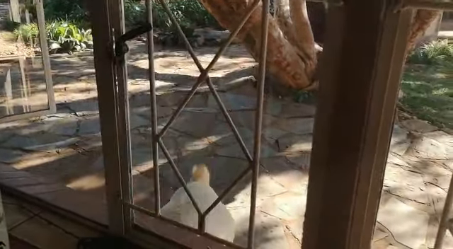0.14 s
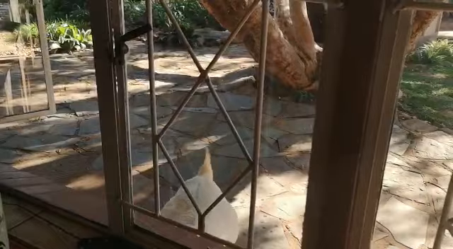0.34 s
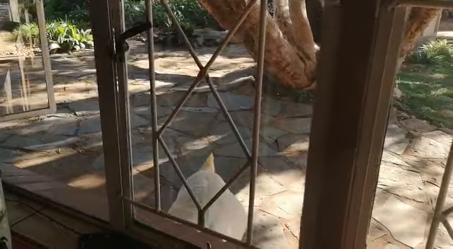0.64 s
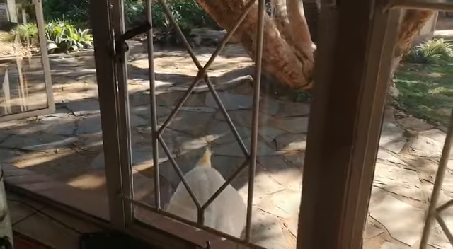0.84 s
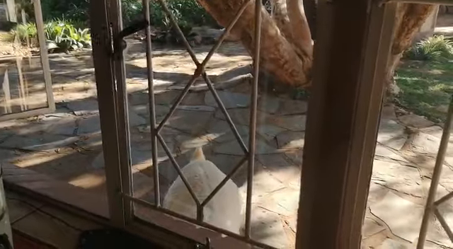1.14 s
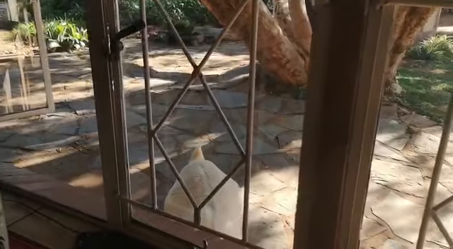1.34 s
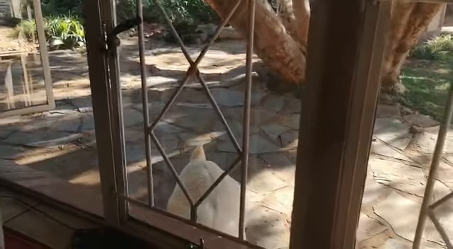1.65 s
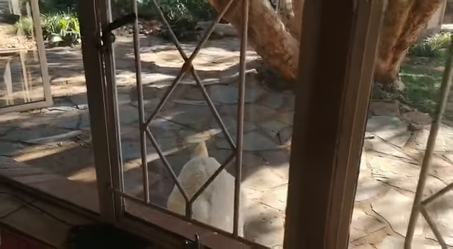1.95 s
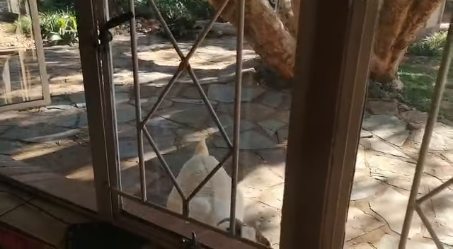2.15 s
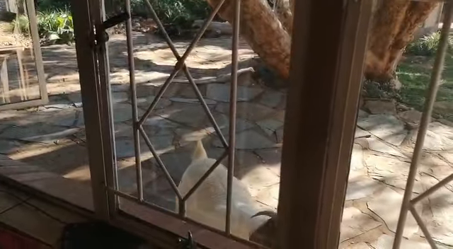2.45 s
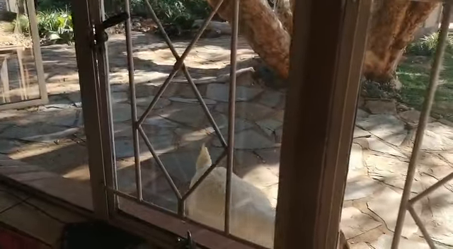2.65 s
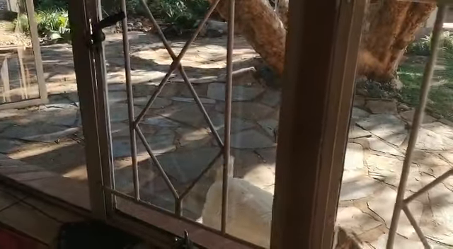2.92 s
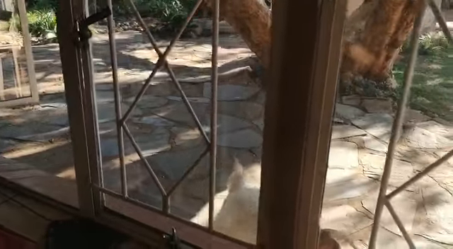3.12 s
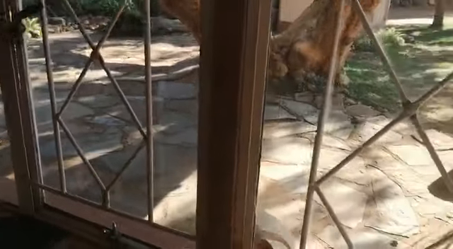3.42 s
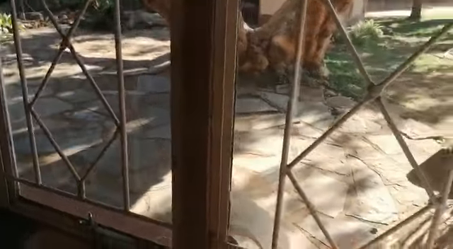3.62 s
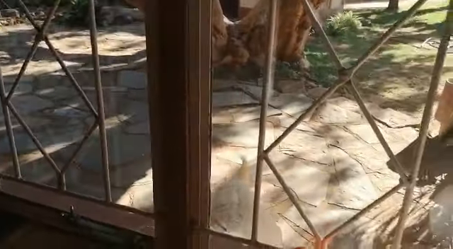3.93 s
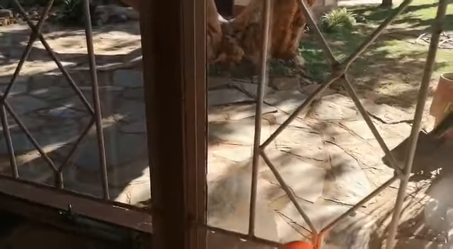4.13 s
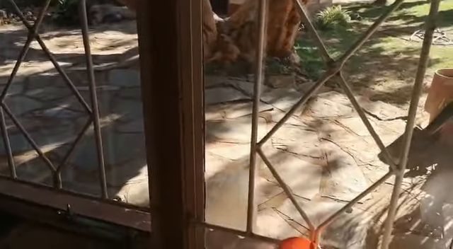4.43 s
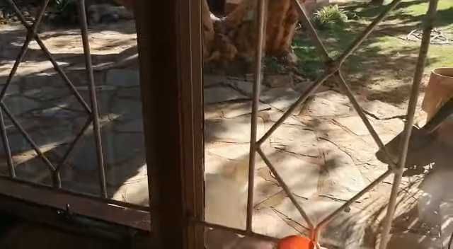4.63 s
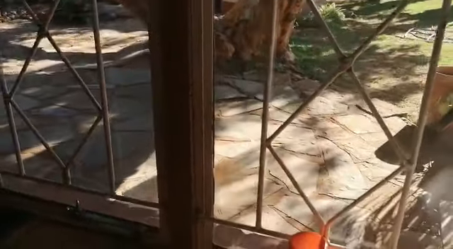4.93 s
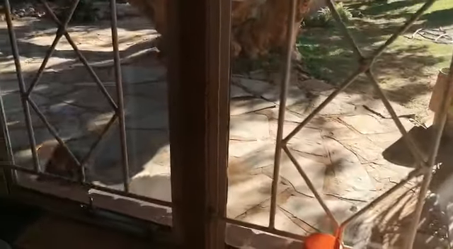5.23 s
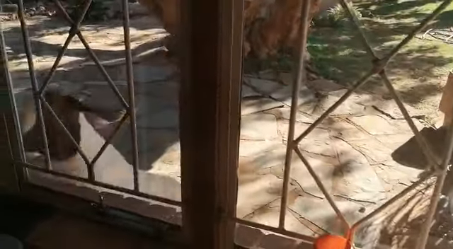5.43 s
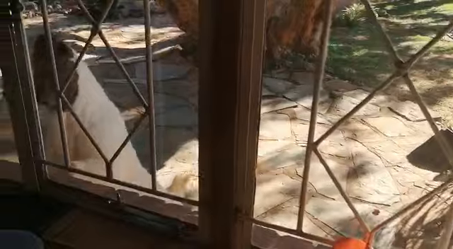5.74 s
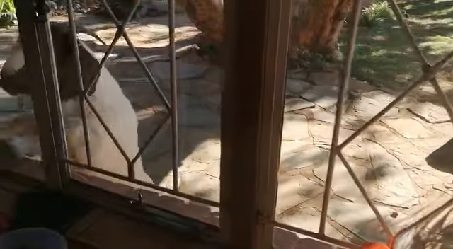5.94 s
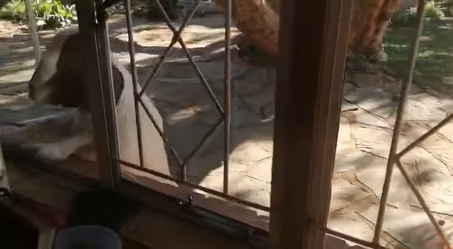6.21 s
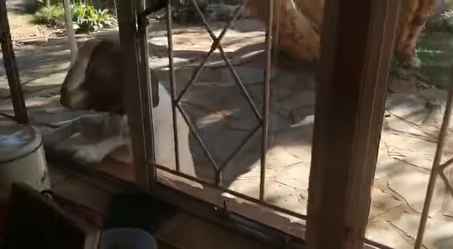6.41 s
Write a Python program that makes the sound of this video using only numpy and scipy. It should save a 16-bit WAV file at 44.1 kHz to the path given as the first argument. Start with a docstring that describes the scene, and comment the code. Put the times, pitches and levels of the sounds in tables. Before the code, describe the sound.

A goat butts a barred window while the microphone sits indoors nearby. Quiet rubbing leads to hard metallic knocks with short ringing bars and booming panes. Scrapes and small squeaks link to another rattling cluster. It suddenly calms to room air, with a couple of barely audible thuds, then soft hoof thumps, clops and gritty scratches. A light garden hiss grows midway.

```python
"""A goat butts and paws at a steel-framed window with burglar bars, heard from the room behind it.
Faint slides and a grind lead to a flurry of blows: damped modes and bursts of noise make the window sway,
the panes boom, the frame knock and the bars chatter, amid grinds, squeaks and a drone of rubbed steel and glass.
A few soft thuds follow; then hooves thump, clop and scratch on the sill.
Room air, a wavering hum and a garden hiss that grows midway, all steady tones and noise, lie underneath."""
import sys
import numpy as np
from scipy import signal
from scipy.fft import rfft, irfft, next_fast_len
from scipy.io import wavfile
from scipy.ndimage import uniform_filter1d, map_coordinates

SR = 44100
rng = np.random.default_rng(int(sys.argv[2]) if len(sys.argv) > 2 else 0)


def generate_wav(sig):
    """Save sig (samples, or channels by samples) to the path in sys.argv[1] as 16-bit PCM at SR."""
    pcm = np.round(np.clip(np.atleast_2d(sig).T, -1, 1) * 32767).astype(np.int16)
    wavfile.write(sys.argv[1], SR, pcm)


N = 289737

# Blows on the window: (time [s], force [dB], shove on the whole window [dB], share of the panes [dB],
# share of the frame [dB], brightness of the clank [dB per octave], sharpness of the horn [dB], contact rise [s])
BLOWS = [(0.104, -60.5, 9.5, 9, -5, 2, -1, 0.016), (1.4801, -23, -19, -6, 4, 3, 2, 0.0001),
         (1.5142, -21.5, -10.5, -8, 0.5, 1, 2.5, 0.0013), (1.543, -21.5, -25, 3, 2, -0.5, 0.5, 0.0013),
         (1.581, -27.5, -30, 1, 4.5, -0.5, 2, 0.00021), (1.617, -38, -13, 8.5, 2, 7, -12, .001),
         (1.682, -37.5, -8.5, -14, -2, -1.5, -7, 0.0007), (2.033, -36.5, -16, 0.5, 0.5, 14, 5, 0.00091),
         (2.168, -40, -18, 6, 1.5, 11, -0.5, 0.00068), (2.197, -41.5, -9, -3, 1, 9, 3, 0.0022),
         (2.262, -25, -28, -4, 0, 1.5, -7, 0.00036), (2.288, -39, -21, -19, -15, 3, 3, 0.00088),
         (2.402, -43, -10, -5, -10, 4.5, -8, 0.0027), (2.512, -45.5, -23, 5.5, 3, -4, -4.5, 0.012),
         (2.813, -25, -28, -12.5, -13.5, -1.5, -7.5, 0.0004), (2.823, -31, -12, -16, -3, 3, 1.5, 0.0092),
         (2.94, -23.5, -10, -1.5, -0.5, 1.5, 5.5, 0.00024), (2.956, -33, -10, -1, 4, 2, -14, 0.0014),
         (2.985, -37.5, -15, -1, 4, 7, 3, 0.0015), (3.059, -35, -14, 2, -7, 0, -6, 0.0042),
         (3.099, -25.5, -11, -8, 1, -4, -2.5, 0.00018), (3.124, -31, -4, -10, -3.5, -9, -3.5, 0.0016),
         (3.16, -32, -15, -13, 1, 11, -1, 0.0012), (3.209, -33, 4.5, -9, 2.5, 7, 0, 0.0014),
         (3.258, -28, -3, -6.5, -2.5, -2, -2, 0.00018), (3.297, -48, 3.5, 10, -3, -9, 6, 0.0028),
         (4.179, -53.5, -14, 14.5, 1.5, 1, -5, 0.0019), (4.271, -61, 12.5, 23, -8, 2, -1, 0.0027),
         (4.329, -59.5, -12, -1, -4, 2, 7, 0.003), (5.331, -69.5, -13, 11.5, -10, 2, -4, 0.0084)]
# Damped modes of the whole window, panes, frame and bars:
# (frequency [Hz], relative level [dB], longest decay t60 [s])
SWAY = [(31.8, 4, 0.34), (51.5, 1, 0.27)]
PANES = [(83, 0, 0.12), (107.1, 7.5, 0.42), (118, 27, 0.17), (147.5, 10.5, 0.26), (161, 12, 0.15),
         (188.5, -2.5, 0.64)]
FRAME = [(229, -3, 0.54), (268.6, 12, 0.22), (290.4, 1, 0.43), (344.4, 3.5, 0.21), (403.7, -2, 0.43),
         (467, -3.5, 0.39), (558.6, 0, 0.38), (692, -7.5, 0.35)]
BARS = [(735, -16, 0.43), (832, -6, 0.2), (951, 0, 0.18), (1030, -1.5, 0.097), (1105, -6, 0.16),
        (1216, -9, 0.27), (1430, -10, 0.27), (1590, 0, 0.16), (1660, 3.5, 0.44), (1800, -13, 0.17),
        (1940, 3.5, 0.18), (2200, -16, 0.22), (2470, -11, 0.32), (2935, -3, 0.083)]
# Noise spectra of the dense rattle in panes, frame, bars and contact: (frequency [Hz], density [dB per Hz])
BOOM = [(35, -14), (70, -10), (120, -3.5), (190, -19.5), (300, -62)]
KNOCK = [(130, -34.5), (215, -2.5), (285, -0.5), (420, -2.5), (600, -13), (950, -63)]
CLANK = [(380, -21.5), (680, 5.5), (1100, 1.5), (1700, -1), (2150, 2), (2850, -3), (3400, -21),
         (6000, -27.5)]
TICK = [(1800, -48), (3300, -3.5), (5000, -5.5), (7500, -7.5), (9500, -13), (11000, -14.5), (12500, -20.5),
        (15000, -33)]
TICK_DB = -15  # contact tick before the sharpness of the horn is added
SPOT_RIPPLE_DB = 4.5  # each struck spot favours other overtones of the steel

# A loose bar clacks against the frame: (time [s], level [dB], centre [Hz])
CLACKS = [(1.481, -23.5, 1640), (1.5157, -24, 2190), (1.526, -27, 1440), (1.614, -35, 2240),
          (1.66, -46, 1790), (1.684, -41.5, 1600), (2.049, -38, 2140), (2.065, -38, 2200),
          (2.266, -24, 1100), (2.8144, -22.5, 2100), (2.867, -36, 2800), (2.944, -23.5, 1500),
          (2.953, -27, 1670), (3.059, -40, 1820), (3.068, -35, 2020), (3.088, -35.5, 2450),
          (3.101, -21, 1160), (3.128, -29, 1090), (3.162, -32, 1480), (3.259, -34.5, 1850),
          (5.7315, -43, 1100), (6.328, -54, 2200)]
CLACK_T60_S, CLACK_ROOM_DB, CLACK_SKIRT_DB = 0.022, -16.5, -15.5  # skirt: level an octave off the centre
# A bar struck at one spot sings out briefly: (time [s], frequency [Hz], level [dB], decay t60 [s])
SINGS = [(1.48, 1560, -16.5, 0.11), (1.519, 407, -15, 0.2), (1.517, 1388, -21.5, 0.22),
         (1.545, 520, -24, .2), (1.542, 5840, -29, 0.019), (1.582, 1285, -30, 0.2),
         (1.632, 1652, -41, 0.32), (2.034, 554, -33.5, 0.18), (2.264, 1075, -21, 0.054),
         (2.263, 1903, -17, 0.046), (2.262, 334, -22, 0.05), (2.814, 1665, -21, 0.25),
         (2.814, 1135, -29, 0.38), (2.814, 2960, -29.5, 0.18), (3.1, 1064, -21.5, 0.13),
         (3.101, 3520, -30, 0.092), (3.125, 1057, -35, 0.22), (4.18, 296, -45.5, 0.17),
         (5.729, 965, -43, 0.18), (5.806, 1960, -47, 0.17), (6.327, 2210, -50.5, 0.065)]
SING_RISE_S = 0.00034
# Horn squeaks on a bar: (time [s], length [s], frequency [Hz], level [dB], line width [Hz])
SQUEAKS = [(2.05, 0.029, 2035, -32, 90), (2.048, 0.04, 2966, -43, 40), (2.05, .11, 1660, -48, 40),
           (2.098, .04, 1990, -44, 130), (2.168, .03, 590, -37, 50), (2.976, 0.066, 610, -34, 30),
           (3.195, 0.04, 1653, -30.5, 4), (3.27, 0.06, 1653, -38, 4)]
SQUEAK_RISE_S, SQUEAK_FADE_DB_PER_S = 0.004, 502
SQUEAK_FLUTTER_DB, SQUEAK_SLIPS_PER_S = 2.5, 110
# A hard tip scratches over metal or grit: (time [s], length [s], centre [Hz], level [dB])
SCRATCHES = [(0.18, .004, 7300, -64), (2.122, 0.02, 3830, -58), (2.238, 0.004, 6360, -49),
             (2.252, 0.004, 7150, -43), (2.652, .012, 4050, -65), (2.866, 0.008, 5600, -40),
             (2.951, .005, 6000, -30), (3.056, 0.0069, 6460, -58), (3.164, 0.041, 5200, -44),
             (5.412, 0.018, 8600, -74), (5.85, 0.027, 6500, -61), (6.028, .008, 4000, -66),
             (6.076, .02, 4500, -56), (6.158, .004, 5600, -62), (6.177, 0.005, 6300, -57.5),
             (6.201, .004, 6500, -62)]
SCRATCH_CATCHES_PER_S, SCRATCH_SKIRT_DB, SCRATCH_ROOM_DB = 1300, -12.5, -27  # skirt: an octave off the centre

# Grinds across the bars: (touch [s], full pressure [s], let go [s], relative rasp [dB], relative judder [dB])
GRINDS = [(0.9, 1.364, 1.45, -64, -48), (2.026, 2.075, 2.38, -53, -47), (2.21, 2.253, 2.388, -45.5, -42.5),
          (2.476, 2.512, 2.555, -49, -50), (2.582, 2.862, 2.99, -36, -31),
          (3.077, 3.16, 3.21, -34.5, -27.5)]
GRIND_SWELL_DB, GRIND_FADE_DB_PER_S = 22.5, 220
STICK_SLIP_DB, STICK_SLIP_PER_S = 2, 45  # the horn sticks and slips, so a grind comes in uneven surges
# Noise spectrum of the juddering frame: (frequency [Hz], density [dB per Hz])
JUDDER = [(45, -41), (100, 0.5), (160, 5), (240, -6), (420, -6), (700, -5.5), (1200, -24)]
# Light slides along the frame: (touch [s], full pressure [s], let go [s], relative hiss [dB],
# answer of the bar [dB], whistle [Hz], whistle relative to the hiss setting [dB])
SLIDES = [(0.04, 0.13, 0.14, -67.5, -72, 5700, -9), (0.74, 1.34, 1.382, -47, -40.5, 10650, -13.5),
          (2.622, 2.913, 2.94, -47, -53, 7630, -17), (3.062, 3.18, 3.21, -57, -61, 7440, -9),
          (3.252, 3.412, 3.53, -76.5, -75, 8850, -8)]
SLIDE_SWELL_DB, SLIDE_FADE_DB_PER_S = 28, 110
WHISTLE_OCTAVES = 0.16  # half width of the thin whistle in a slide
# Noise spectra of the slide and of the lower bar that answers it: (frequency [Hz], density [dB per Hz])
SWISH = [(240, -26), (350, -5), (560, -8.5), (701, -2.5), (850, -18.5), (1190, -19.5), (1430, -12),
         (1570, -15), (2300, 1), (2650, -1), (3340, -3.5), (4200, -3.5), (5700, -7.5), (6200, -15.5),
         (7000, -5), (7900, -14), (8690, -8.5), (9370, -18.5), (11000, -14.5), (12000, -23), (13000, -23),
         (15000, -39)]
BAR_RUB = [(600, -17), (1000, -7.5), (1250, -17), (1430, -4.5), (1700, -7), (2200, 2), (2700, -0.5),
           (3400, -30)]
BAR_RUB_LAG_S = 0.066
# One rub that makes a pane drone: (touch [s], full pressure [s], let go [s])
GROAN_S = (2.04, 2.33, 2.39)
GROAN_DB, GROAN_SWELL_DB, GROAN_FADE_DB_PER_S = -31.5, 8.5, 229

# Hooves on the outer sill: (time [s], thump [dB], clop [dB], brightness of the clop [dB per octave])
HOOVES = [(5.503, -44.5, -54, 2.5), (5.728, -56, -44, 0.5), (5.763, -63, -49.5, -4), (5.804, -40, -40, 0.5),
          (6.075, -48.5, -43.5, 1.5), (6.125, -47, -47.5, -8.5), (6.176, -60, -55.5, 4),
          (6.214, -56, -51.5, -1.5), (6.327, -50, -61, 4)]
HOOF_RISE_S = 0.0033
# Modes of the sill with its wall, then what a hoof rings on it:
# (frequency [Hz], relative level [dB], longest decay t60 [s])
SILL = [(52.7, 5, 0.77), (65.8, -3.5, 1), (94.7, -6.5, 0.92), (142.3, -11, 0.49), (197.1, -8, 0.41)]
HOOF_MODES = [(322.5, -6, 0.52), (657, -1.5, 0.11), (749, -2, 0.24), (1264, -11.5, 0.3), (1400, -11, .33),
              (1770, -15, 0.13), (1880, -3, 0.24), (2360, -15, 0.15), (2530, -4.5, 0.18)]
# Noise spectrum of a hoof on the sill: (frequency [Hz], density [dB per Hz])
CLOP = [(110, 0.5), (200, 7.5), (270, -3.5), (370, 8.5), (480, -4), (600, 2.5), (950, -2.5), (1400, -7),
        (2300, -6.5), (3200, -15), (5000, -22.5), (9000, -32.5), (15000, -46)]

# Noise spectra of the room air and the far garden: (frequency [Hz], density [dB per Hz])
AIR = [(12, -60), (20, 0.5), (62, -2.5), (189, -10.5), (211, -8), (294, -7.5), (387, -5.5), (445, -15.5),
       (484, -16), (1140, -15.5), (1390, -19), (1730, -12.5), (2770, -21), (5090, -32.5), (15000, -39)]
GARDEN_HISS = [(2000, -0.5), (3600, 0), (4800, 1), (5800, -2.5), (6800, -1.5), (8000, -9), (11000, -13),
               (15000, -38)]
GARDEN_DB, GARDEN_GROWTH_DB = -72.5, 10.5  # starting level, and how much louder it levels off
GARDEN_RISES_AT_S, GARDEN_RISE_DB_PER_S = 3.25, 4
# Tones of the hum: (frequency [Hz], level [dB])
HUM = [(222, -72.5), (338, -78), (384, -74.5), (746, -77.5)]

# Reverberation of the room: (frequency [Hz], decay t60 [s])
ROOM = [(100, 0.57), (300, 0.29), (1000, 0.36), (2500, 0.37), (6000, 0.31), (14000, 0.22)]
# Echoes off the reveal, sill and panes: (left delay [s], right delay [s], level before the treble share [dB])
NEAR_WALLS = [(.00058, 0.000455, -18.5), (.00131, 0.000901, -22.5), (.0029, .0024, -13.5),
              (.0047, .0056, -14.5), (.0083, .0071, -12.5)]
LEFT_LEAD_S, LEAD_BELOW_HZ = 0.0001, 950  # the struck pane is to the left; only its long waves arrive direct
# Likeness of the two microphones in a diffuse field: (frequency [Hz], left-right likeness [-1 to 1])
ALIKE = [(60, 1), (130, 0.99), (290, 0.91), (450, 0.25), (700, -0.36), (1400, 0.14), (2500, -0.39),
         (4500, -0.024), (15000, 0.082)]
# Colour difference of the two microphones: (frequency [Hz], left minus right [dB])
LEAN = [(200, -0.5), (400, -1), (700, 0), (1300, -2.5), (2400, 0), (4400, -1.5), (8000, 7), (10500, -6.5),
        (13000, -7)]
TOP_HZ = 15700


def blows():
    """Every blow shares its force among the window's parts, from slow sway to sharp tick."""
    t = np.arange(int(.7 * SR)) / SR
    out = np.zeros((2, N + SR))
    # fast parts are levelled over their first 25 ms, slow ones over 50 ms
    onset = lambda x: unit(x, size=1100)
    swing = lambda x: unit(x, size=2200)
    for s, force_db, shove_db, pane_db, knock_db, tilt_db, sharp_db, rise in BLOWS:
        sway = amp(5) * swing(ring(SWAY, t, scatter_db=0, attack=.012))

        boom = amp(-0.5) * swing(ring(PANES, t, scatter_db=7.5, attack=rise + 0.00038))
        boom += amp(-6.5) * swing(colour(diffuse(room_tail(len(t))), BOOM))

        frame_rattle = rattle(t, rise, KNOCK, crack_db=8.5, crack_t60=0.05, chatter_db=-4, chatter_t60=0.33)
        knock = amp(-4) * onset(ring(FRAME, t, scatter_db=9.0, attack=rise))
        knock += amp(-3.5) * onset(frame_rattle)

        bar_colour = tilted(CLANK, tilt_db, pivot_hz=1500)
        bar_rattle = rattle(t, rise, bar_colour, crack_db=6.0, crack_t60=0.02, chatter_db=0, chatter_t60=0.21)
        clank = amp(-15.5) * onset(ring(BARS, t, scatter_db=11.0, attack=rise))
        clank += amp(-4.5) * onset(bar_rattle)

        tip_db = np.clip(.5 * sharp_db - 2.5, -6, 8)  # a sharp horn tip ticks louder and brighter
        bright = at_new_spot(tilted(TICK, tip_db, pivot_hz=5000))
        tip_rattle = rattle(t, rise + 0.001, bright, crack_db=17.5, crack_t60=0.021,
                            chatter_db=-3, chatter_t60=0.073)
        tick = amp(3.5) * onset(tip_rattle)

        body = amp(shove_db) * sway + amp(pane_db) * boom + amp(knock_db) * knock
        add_at(out, s, amp(force_db) * (body + clank + amp(TICK_DB + sharp_db) * tick))
    return out[:, :N]


def clacks():
    """Steel meets steel: a hard, very short burst in the middle range, and the room after it."""
    t = np.arange(SR // 3) / SR
    out = np.zeros((2, N + SR))
    for s, db, hz in CLACKS:
        burst = rng.standard_normal((2, len(t))) * amp(-60 * t / CLACK_T60_S)
        burst += amp(CLACK_ROOM_DB) * room_tail(len(t))
        band = [(hz / 4, 2 * CLACK_SKIRT_DB), (hz / 2, CLACK_SKIRT_DB), (hz / 1.3, 0),
                (hz * 1.3, 0), (2 * hz, CLACK_SKIRT_DB), (4 * hz, 2 * CLACK_SKIRT_DB)]
        clack = colour(diffuse(burst), at_new_spot(band))
        add_at(out, s, amp(db) * unit(clack, size=220))
    return out[:, :N]


def singing_bars():
    """A struck bar gives a short rough tone; the shorter, the rougher."""
    t = np.arange(SR // 2) / SR
    out = np.zeros((2, N + SR))
    for s, hz, db, t60 in SINGS:
        width_hz = 2.2 / t60 ** 2
        shape = (1 - np.exp(-t / SING_RISE_S)) * amp(-60 * t / t60)
        add_at(out, s, amp(db) * rough_tone(t, hz, width_hz) * shape / shape.max())
    return out[:, :N]


def squeaks():
    """A rubbed bar holds a fluttering note for as long as the horn sticks and slips on it."""
    t = np.arange(SR // 4) / SR
    out = np.zeros((2, N + SR))
    for s, length, hz, db, width_hz in SQUEAKS:
        held = amp(db - SQUEAK_FADE_DB_PER_S * np.maximum(t - length, 0))
        level = held * (1 - np.exp(-t / SQUEAK_RISE_S))
        flutter = unit(amp(SQUEAK_FLUTTER_DB * wobble(SQUEAK_SLIPS_PER_S)[:len(t)]))
        add_at(out, s, level * flutter * rough_tone(t, hz, width_hz))
    return out[:, :N]


def scratches():
    """A horn or hoof tip skids: a short run of sharp catches, and the room after them."""
    t = np.arange(SR // 4) / SR
    out = np.zeros((2, N + SR))
    for s, length, hz, db in SCRATCHES:
        caught = rng.standard_normal((2, len(t))) * (rng.random(len(t)) < SCRATCH_CATCHES_PER_S / SR)
        catches = caught * np.exp(-(t / length) ** 4)
        room = signal.fftconvolve(catches, room_tail(len(t)), axes=1)[:, :len(t)] / 2
        heard = catches + amp(SCRATCH_ROOM_DB) * room
        band = [(hz / 4, 3 * SCRATCH_SKIRT_DB), (hz / 2, SCRATCH_SKIRT_DB), (hz, 0),
                (min(2 * hz, TOP_HZ), SCRATCH_SKIRT_DB)]
        scratch = colour(diffuse(heard), at_new_spot(band))
        add_at(out, s, amp(db) * unit(scratch, size=int(length * SR) + 1))
    return out[:, :N]


def grinds():
    """Pressed hard, the horn catches on the bars and makes the frame judder."""
    rasping, juddering = 0, 0
    for touch, full, let_go, rasp_db, judder_db in GRINDS:
        pressure = stroke(touch, full, let_go, 0, GRIND_SWELL_DB, GRIND_FADE_DB_PER_S)
        rasping = rasping + amp(rasp_db) * pressure
        juddering = juddering + amp(judder_db) * pressure
    friction = slips(rate=160, spread_db=1.0, snap_db=13.5)
    catches = unit(colour(friction, tilted(CLANK, 2.7, pivot_hz=1500)))
    steel = unit(filtered(catches, lambda hz: resonances(BARS, hz)))
    surges = unit(amp(STICK_SLIP_DB * wobble(STICK_SLIP_PER_S)))
    rasp = rasping * surges * patches(amp(-9.5) * catches + amp(-9.5) * steel, depth_db=3.0)
    judder = amp(-4) * juddering * surges * rush(JUDDER, grain_db=0.5)
    return rasp + judder


def slides():
    """A smooth slide hisses with a thin whistle in it, and the rubbed bar answers a little later."""
    sliding, answering, whistling = 0, 0, 0
    for touch, full, let_go, hiss_db, bar_db, whistle_hz, whistle_db in SLIDES:
        pressure = stroke(touch, full, let_go, 0, SLIDE_SWELL_DB, SLIDE_FADE_DB_PER_S)
        sliding = sliding + amp(hiss_db) * pressure
        answering = answering + amp(bar_db) * pressure
        whistling = whistling + amp(hiss_db + whistle_db) * pressure * whistle(whistle_hz)
    even_hiss = rush(SWISH, grain_db=-1.0)
    fine_catches = unit(colour(slips(rate=1100, spread_db=3.5, snap_db=10.5), SWISH))
    hiss = amp(7.5) * (sliding * patches(even_hiss + fine_catches, depth_db=1.8) + whistling)
    late_answer = np.roll(answering, round(BAR_RUB_LAG_S * SR))
    return hiss + late_answer * rush(BAR_RUB, grain_db=0.5)


def whistle(hz):
    """The narrow band of hiss that one sliding spot favours."""
    edge = 2 ** WHISTLE_OCTAVES
    return rush([(hz / edge, -22), (hz, 0), (hz * edge, -22)], grain_db=7)


def groan():
    """Steady rubbing keeps one pane droning on a low, wavering note."""
    pitch_hz = 105 * (1 + 0.023 * wobble(25.8))
    level = stroke(*GROAN_S, GROAN_DB, GROAN_SWELL_DB, GROAN_FADE_DB_PER_S)
    return level * np.sqrt(2) * np.sin(2 * np.pi * np.cumsum(pitch_hz) / SR)


def hooves():
    """The goat rears up: each hoof thumps the sill, clops on it and rings it briefly."""
    t = np.arange(int(.7 * SR)) / SR
    out = np.zeros((2, N + SR))
    for s, thump_db, clop_db, tilt_db in HOOVES:
        thump = unit(ring(SILL, t, scatter_db=2.0, attack=0.0062), size=2200)
        spectrum = tilted(CLOP, tilt_db, pivot_hz=900)
        impact = rattle(t, HOOF_RISE_S, spectrum, crack_db=13.5, crack_t60=0.011,
                        chatter_db=-5.0, chatter_t60=0.17)
        clop = unit(impact, size=1100)
        clop += amp(-7.0) * unit(ring(HOOF_MODES, t, scatter_db=6, attack=0.0017), size=1100)
        add_at(out, s, amp(thump_db) * thump + amp(clop_db) * clop)
    return out[:, :N]


def background():
    """Room air, the wavering hum of an appliance and a far hiss from the garden."""
    t = np.arange(N) / SR
    hum = 0
    for hz, db in HUM:
        hum = hum + amp(db) * np.sqrt(2) * np.sin(2 * np.pi * hz * t + 1.26 * wobble(6))
    growth_db = np.clip(GARDEN_RISE_DB_PER_S * (t - GARDEN_RISES_AT_S), 0, GARDEN_GROWTH_DB)
    return amp(-58) * rush(AIR) + hum + amp(GARDEN_DB + growth_db) * rush(GARDEN_HISS)


def near_walls(x):
    """Close surfaces throw back the short waves and comb the treble."""
    def response(hz):
        echoes, power = 0, 0
        for left, right, db in NEAR_WALLS:
            echoes = echoes + amp(db) * np.exp(-2j * np.pi * hz * np.array([[left], [right]]))
            power = power + amp(db) ** 2
        share = hz ** 2 / (hz ** 2 + 1400 ** 2)
        return (1 + share * echoes) / np.sqrt(1 + share ** 2 * power)
    return filtered(x, response)


def from_the_left(x):
    """The long waves of the window reach the left microphone first."""
    lead = lambda hz: LEFT_LEAD_S / (1 + (hz / LEAD_BELOW_HZ) ** 4)
    return filtered(x, lambda hz: np.exp(1j * np.pi * hz * lead(hz) * np.array([[1], [-1]])))


def room_tail(size):
    """The room's answer to one click: each frequency dies at its own speed."""
    hz, t, z = signal.stft(rng.standard_normal((2, size)), SR, nperseg=256)
    decay = amp(-60 * t / along(ROOM, hz)[:, None])
    return signal.istft(z * decay, SR, nperseg=256)[1][:, :size]


def ring(modes, t, scatter_db, attack):
    """Damped modes at new strengths; higher ones reach the two microphones out of step."""
    hz, db, t60 = np.transpose(modes)[:, :, None]
    hz = hz * (1 + 0.0086 * rng.standard_normal(hz.shape))  # the animal's weight detunes the loose parts
    t60 = np.minimum(t60, 450 / hz)  # putty and paint let no mode ring much longer than 450 cycles
    level = amp(db + scatter_db * rng.uniform(-0.67, 1, hz.shape) - 60 * t / t60)
    skew = np.arccos(np.clip(along(ALIKE, hz), -1, 1)) / 2 * rng.choice([-1, 1], hz.shape)
    sign = (-1) ** np.arange(len(hz))[:, None]
    pair = []
    for side in (1, -1):
        phase = np.float32(2 * np.pi * hz * t + side * skew)
        pair.append(np.sum(sign * level * np.sin(phase), axis=0))
    return np.array(pair) * (1 - np.exp(-t / attack))


def rattle(t, rise, spectrum, crack_db, crack_t60, chatter_db, chatter_t60):
    """A crack, the chatter of loose parts after it, and the room; soft contacts build up slowly."""
    crack = rng.standard_normal((2, len(t))) * amp(crack_db - 60 * t / crack_t60)
    contacts = unit(rng.standard_normal((2, len(t))) * (rng.random(len(t)) < 300 / SR))  # 300 a second
    chatter = contacts * amp(chatter_db - 60 * t / chatter_t60)
    heard = diffuse(crack + chatter + room_tail(len(t)))
    return colour(heard * (1 - np.exp(-t / rise)), spectrum)


def resonances(modes, hz):
    """Response of a set of damped modes to a steady drive."""
    total = 0
    for k, (centre, db, t60) in enumerate(modes):
        width = np.log(1000) / np.pi / t60
        band = 1j * hz * width / (centre ** 2 - hz ** 2 + 1j * hz * width)
        total = total + (-1) ** k * amp(db) * band
    return total


def stroke(touch, full, let_go, db, swell_db, fade_db_per_s):
    """Gain of one rub: it grows from nothing while the pressure builds, holds, and fades once let go."""
    t = np.arange(N) / SR
    pressure = np.clip((t - touch) / max(full - touch, 1 / SR), 0, 1)
    level = db - swell_db * (1 - pressure) - fade_db_per_s * np.maximum(t - let_go, 0)
    return amp(level) * np.minimum(3 * pressure, 1)


def slips(rate, spread_db, snap_db):
    """Friction as a stream of tiny catches of uneven size, with the room's answer to them."""
    size = amp(spread_db * np.minimum(rng.exponential(size=N), 3))
    catches = (rng.random(N) < rate / SR) * size * rng.choice([-1, 1], N)
    t = np.arange(SR // 5) / SR
    snap = rng.standard_normal((2, len(t))) * amp(snap_db - 60 * t / .009)
    answer = snap + room_tail(len(t)) * amp(-60 * t / .5)
    return unit(diffuse(signal.fftconvolve(catches[None], answer, axes=1)[:, :N]))


def patches(x, depth_db):
    """Slow random patches of gain over time and frequency, as the touching spot moves."""
    z = signal.stft(x, nperseg=512)[2]
    field = uniform_filter1d(rng.standard_normal(z.shape[1:]), size=5, axis=0)
    field = uniform_filter1d(field, size=22, axis=1)
    return unit(signal.istft(z * amp(depth_db * unit(field)), nperseg=512)[1][:, :N])


def rough_tone(t, hz, width_hz):
    """A stereo tone whose phase wanders, as the contact keeps slipping."""
    steps = rng.standard_normal((2, len(t))) * np.sqrt(2 * np.pi * width_hz / SR)
    wander = uniform_filter1d(np.cumsum(steps, axis=1), size=40)
    return np.sin(2 * np.pi * hz * t + wander + np.array([[0], [1.9]]))


def rush(spectrum, grain_db=0):
    """Stereo noise of rms 1; grain_db breaks it into tiny slips."""
    noise = rng.standard_normal((2, N)) * amp(grain_db * wobble(400))
    return unit(colour(diffuse(noise), spectrum))


def diffuse(pair):
    """Two unrelated signals as a diffuse field at two close microphones."""
    turn = lambda hz: np.arccos(np.clip(along(ALIKE, hz), -1, 1)) / 2
    mid, side = filtered(pair, lambda hz: np.array([np.cos(turn(hz)), np.sin(turn(hz))]))
    return np.array([mid + side, mid - side])


def tilted(points, db_per_octave, pivot_hz):
    """A spectrum made brighter or duller around a pivot."""
    return [(hz, db + db_per_octave * np.log2(hz / pivot_hz)) for hz, db in points]


def at_new_spot(points):
    """A spectrum with the random peaks and dips of one place of contact."""
    hz = np.arange(points[0][0], points[-1][0], 280)
    ripple = rng.standard_normal(64)[:len(hz)]
    return list(zip(hz, along(points, hz) + SPOT_RIPPLE_DB * ripple))


def colour(x, points):
    """Causal minimum-phase filter with the gain of (Hz, dB) points, closed beyond the ends."""
    def response(hz):
        closed = [(points[0][0] / 2, -90), *points, (points[-1][0] * 2, -90)]
        cepstrum = irfft(np.log(amp(along(closed, hz))))
        half = len(cepstrum) // 2
        return np.exp(rfft(np.r_[cepstrum[0], 2 * cepstrum[1:half], np.zeros(half)]))
    return filtered(x, response)


def filtered(x, response):
    """x times a response of frequency, padded so that tails do not wrap round."""
    n = x.shape[-1]
    m = 2 * next_fast_len(n // 2 + 4096)
    return irfft(rfft(x, m) * response(np.fft.rfftfreq(m, 1 / SR)), m)[..., :n]


def wobble(rate):
    """A smooth random curve, rate knots a second."""
    knots = rng.standard_normal(int(N * rate / SR) + 4)
    return map_coordinates(knots, [np.arange(N) * rate / SR])


def along(points, hz):
    """(Hz, value) points read on a log axis."""
    f, v = np.transpose(points)
    return np.interp(np.log(hz + 1), np.log(f + 1), v)


def unit(x, size=None):
    """x scaled so that its first size samples have rms 1."""
    return x / np.sqrt(np.mean(x[..., :size] ** 2) + 1e-20)


def amp(db):
    """Gain of a level in dB."""
    return np.exp(np.asarray(db) * (np.log(10) / 20))


def add_at(out, s, sound):
    """Mix a stereo sound into out from s seconds on."""
    out[:, round(s * SR):][:, :sound.shape[1]] += sound


def scene():
    """The window and the quiet around it."""
    contacts = blows() + clacks() + singing_bars() + squeaks() + scratches() + grinds() + hooves()
    window = near_walls(contacts) + slides() + groan()
    return from_the_left(window) + background()


def record(dry):
    """The two microphones differ in colour; nothing is kept above the band limit."""
    half_each = np.array([[.5], [-.5]])
    return filtered(dry, lambda hz: amp(half_each * along(LEAN, hz)) * (hz < TOP_HZ))


dry = scene()
out = record(dry)
generate_wav(out)
```